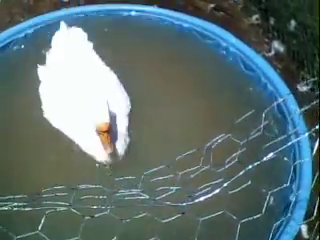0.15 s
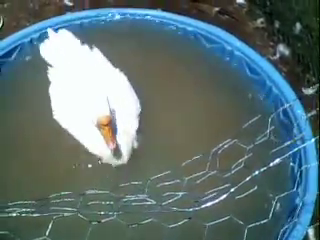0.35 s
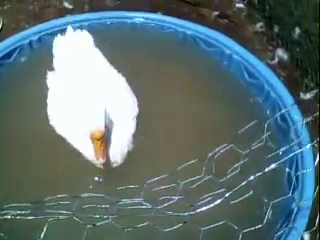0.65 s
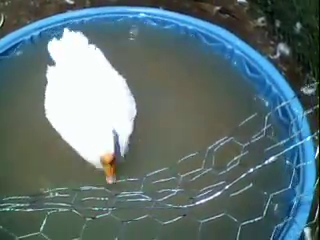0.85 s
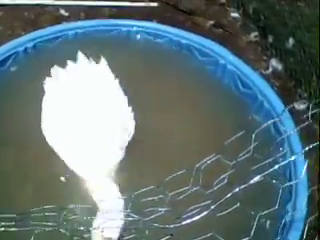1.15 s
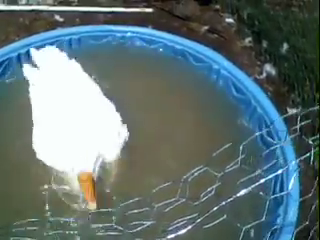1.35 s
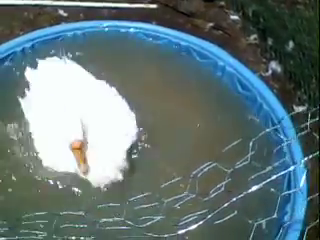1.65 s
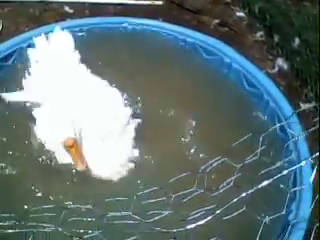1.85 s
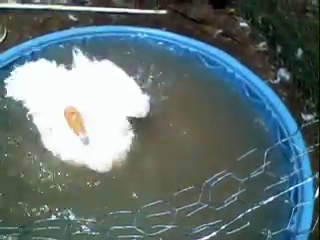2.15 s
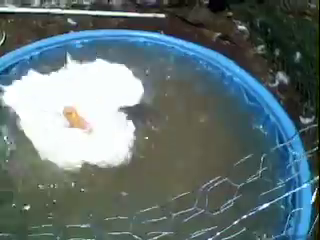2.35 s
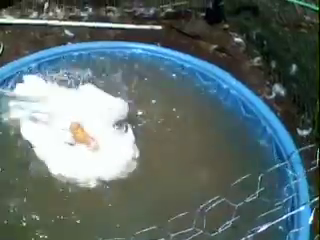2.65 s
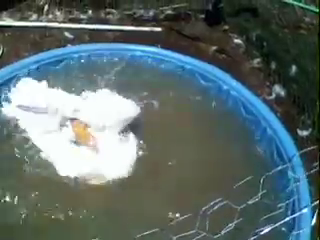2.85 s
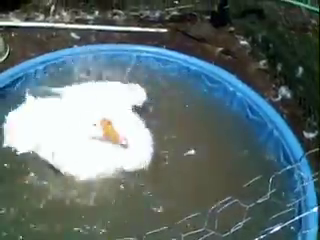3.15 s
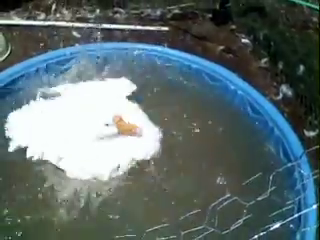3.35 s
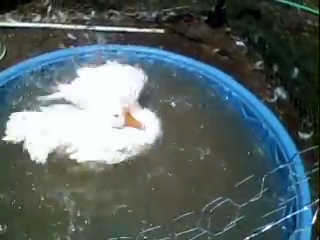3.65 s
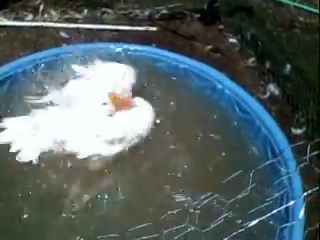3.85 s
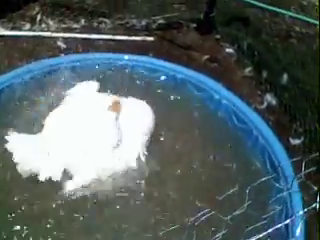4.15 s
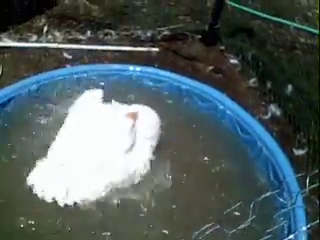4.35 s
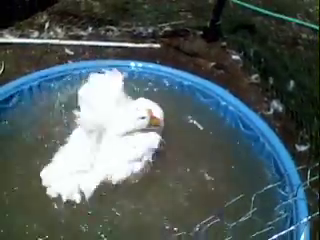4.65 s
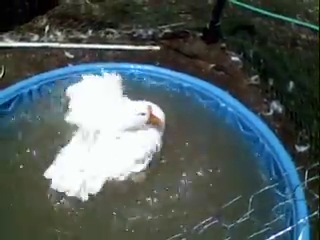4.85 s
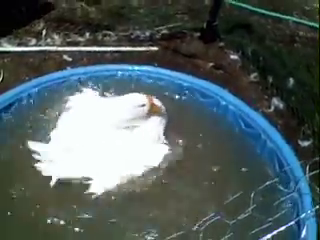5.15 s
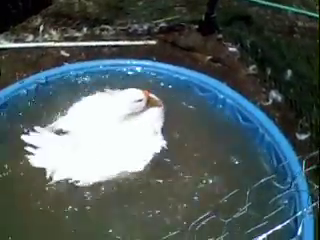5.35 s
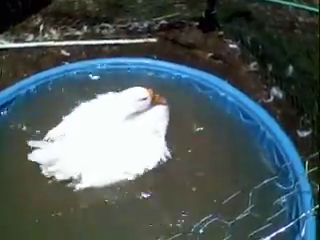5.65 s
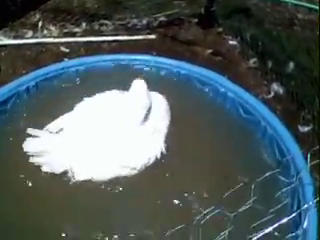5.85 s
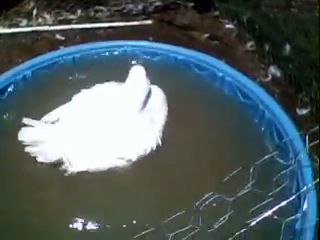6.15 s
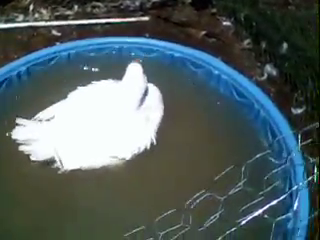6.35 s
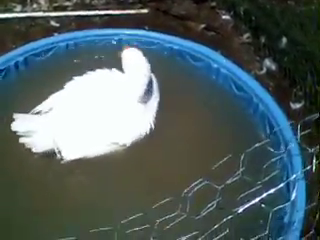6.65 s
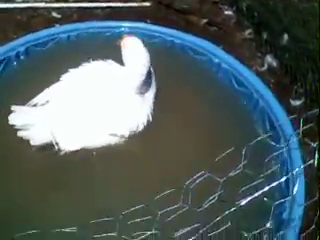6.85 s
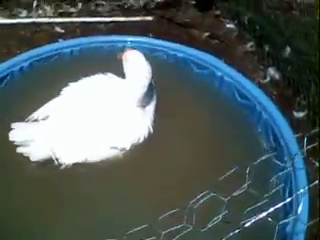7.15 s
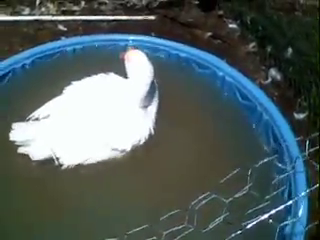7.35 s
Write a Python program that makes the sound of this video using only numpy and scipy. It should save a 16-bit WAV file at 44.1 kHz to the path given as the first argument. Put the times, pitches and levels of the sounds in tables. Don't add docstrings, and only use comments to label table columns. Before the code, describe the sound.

Wind buffets the microphone, then a bird's beak plunges with a bubble and wings slosh and slap water before gusts return alone.

```python
import sys
import numpy as np
from scipy import signal
from scipy.fft import rfft, irfft, next_fast_len
from scipy.io import wavfile
from scipy.ndimage import uniform_filter1d

SR = 44100
rng = np.random.default_rng(int(sys.argv[2]) if len(sys.argv) > 2 else 0)


def dump_mix(stems):
    frames = np.atleast_2d(stems).T
    limited = np.clip(frames, -1, 1)
    pcm = np.round(limited * 32767).astype(np.int16)
    wavfile.write(sys.argv[1], SR, pcm)


def undo_db(level):
    steps = np.asarray(level, float) / 20
    return 10 ** steps


N = 331014


def rms_one(x):
    return x / np.sqrt(np.mean(x ** 2) + 1e-20)


def in_time(rows, outside=None):
    s, *columns = np.transpose(rows)
    t = np.arange(N) / SR
    return [np.interp(t, s, column, left=outside, right=outside) for column in columns]


def band(x, low_hz, high_hz, order=2):
    return signal.sosfilt(signal.butter(order, [low_hz, high_hz], "band", fs=SR, output="sos"), x)


def coloured(spectrum):
    size = next_fast_len(N)
    hz, db = np.transpose(spectrum)
    bins_hz = np.arange(size // 2 + 1) * SR / size + 0.055
    gain = undo_db(np.interp(np.log(bins_hz), np.log(hz), db))
    noise = rng.standard_normal(size)
    return rms_one(irfft(rfft(noise) * gain, size)[:N])


def drift(rate):
    r = np.exp(-40 * np.pi * rate / SR)
    coarse = rng.standard_normal(N // 20 + 4002)
    slow = signal.lfilter([1], [1, -2 * r, r * r], coarse)[4000:]
    return np.interp(np.arange(N) / 20, np.arange(len(slow)), rms_one(slow))


def add(out, s, sound):
    i = int(s * SR)
    out[i:i + len(sound)] += sound[:N - i]


def bubble(hz, t60, rise, onset_s):
    t = np.arange(int(t60 * SR) + 2) / SR
    ring = np.sin(2 * np.pi * hz * (t + rise * t * t / (2 * t60)))
    return ring * undo_db(-60 * t / t60) * (1 - np.exp(-t / onset_s))


def patter(per_s, spread_db, clump_db, surge, smooth):
    sizes = undo_db(spread_db * np.minimum(rng.exponential(1, N), 5)) * rng.choice([-1, 1], N)
    born = rng.random(N) < per_s / SR
    clicks = rms_one(sizes * born)
    return rms_one((clicks + smooth * rng.standard_normal(N)) * undo_db(clump_db * surge))


# f/Hz, level/dB per Hz
HISS_COLOUR = [(100, 14.5), (2000, -3), (9000, -3.5), (10500, -6), (11500, -24.5), (12200, -23),
               (20000, -60)]
# f/Hz, level/dB rms
WHINE_TONES = [(1200, -92), (4200, -92), (4800, -96), (5600, -83), (6200, -93), (6600, -96), (7400, -82),
               (8400, -95), (8670, -98), (9000, -100), (10526, -99), (10800, -99), (11250, -102),
               (11524, -106)]


def circuits():
    t = np.arange(N) / SR
    dipping = (t * 100 / 3 - .68) % 1 < .3
    whines = sum(undo_db(db + 5.5) * np.sin(2 * np.pi * (hz * t + rng.random())) for hz, db in WHINE_TONES)
    return undo_db(-70.5) * coloured(HISS_COLOUR) + (1 - .7 * dipping) * whines


# f/Hz, level/dB per Hz
YARD_COLOUR = [(180, -5.5), (350, -4.5), (850, -3.5), (1200, -14), (2200, -22), (4000, -32), (7000, -35)]


def yard():
    start_db, fade_db_per_s, floor_db = -67, 9.5, -76.5
    level = undo_db(start_db - fade_db_per_s * np.arange(N) / SR) + undo_db(floor_db)
    return level * coloured(YARD_COLOUR) * undo_db(0.3 * drift(6.6))


# t/s, level/dB
BREEZE_CURVE = [(0, -43), (.3, -40.5), (.7, -38.5), (1.1, -41), (1.32, -67), (1.5, -43), (2.0, -40.5),
                (2.9, -38.5), (3.3, -50.5), (3.6, -32.5), (4.1, -42.5), (4.7, -39), (5.1, -44), (5.6, -43),
                (6.0, -38), (6.6, -38.5), (7.25, -51), (7.51, -44)]
# t/s of the peak, level/dB, half width/s, sharpness/dB
GUST_PEAKS = [(.23, -31, 0.15, -6), (.48, -26, 0.13, -5), (0.812, -33.5, 0.18, -16),
              (.87, -29.5, 0.036, 5.5), (.97, -31.5, 0.11, 5.5), (5.93, -22.5, 0.032, -8),
              (6.63, -39.5, 0.029, 8.5), (6.77, -39, 0.033, 6), (7.0, -35.5, 0.038, 3),
              (7.234, -41, 0.0091, 10.5), (1.189, -26.5, 0.029, -1.5), (1.38, -32, 0.027, -6),
              (1.841, -41, 0.031, 3), (2.05, -41, 0.033, -1), (2.336, -26, 0.052, -3),
              (2.53, -45, 0.065, 11), (2.739, -32.5, 0.023, 3.5), (3.17, -35, 0.12, 8),
              (3.392, -35, 0.012, -14), (3.51, -33.5, 0.099, 6.5), (3.82, -34, 0.23, 4),
              (4.12, -37, 0.036, -17), (4.22, -52, 0.049, -6), (4.6, -42, 0.049, 6.5),
              (4.89, -32.5, 0.062, 0), (5.248, -26.5, 0.061, -0.5), (5.73, -42.5, 0.11, 10.5),
              (6.081, -27, 0.058, 2), (6.241, -22.5, 0.037, 2), (6.32, -33.5, 0.054, 7),
              (6.5, -26.5, 0.055, -10.5), (6.7, -43.5, 0.051, 11.5), (6.82, -32, 0.021, -8),
              (6.94, -35.5, 0.13, -4), (7.21, -35.5, 0.14, -2)]
MEAN_WIND_DB = -37


def wind_strength():
    t = np.arange(N)[::32] / SR
    force = undo_db(2 * in_time(BREEZE_CURVE)[0][::32])
    bite = force.copy()
    for s, db, width, sharp_db in GUST_PEAKS:
        hump_db = db - 10 * np.abs(t - s) / max(width, .01)
        force += undo_db(2 * hump_db)
        bite += undo_db(2 * (hump_db + sharp_db))
    return [np.interp(np.arange(N) / SR, t, 10 * np.log10(power) - MEAN_WIND_DB) for power in (force, bite)]


# f/Hz, level/dB per Hz
BUFFET_COLOUR = [(8.8, -63), (15, 6), (24, -1.5), (43, -3), (92, -18.5), (120, -30), (160, -48),
                 (260, -120)]
# f/Hz, level/dB per Hz
TURBULENCE_COLOUR = [(47, -20), (80, -2.5), (214, -16.5), (292, -19.5), (450, -30), (580, -34.5),
                     (990, -120)]
# f/Hz, level/dB per Hz
RUSH_COLOUR = [(200, -28), (400, 0.5), (900, -5), (1300, -16), (2300, -25.5), (4000, -42)]
PRESSURE_DB, TURBULENCE_DB, RUSH_DB = -33, -56, -68.5
PRESSURE_FOLLOWS, TURBULENCE_FOLLOWS, RUSH_FOLLOWS = 0.87, 1, 0.62


def wind():
    force_db, bite_db = wind_strength()
    slow_db = uniform_filter1d(force_db, int(0.68 * SR))
    pressure = coloured([(1, -25), (3, 2.0), (16, 1.0), (24, -15.0), (60, -76)])
    puffs = drift(14.0)
    buffet = rms_one(coloured(BUFFET_COLOUR) * undo_db(0.58 * puffs))
    turbulence = rms_one(coloured(TURBULENCE_COLOUR) * undo_db(2.0 * puffs + 2.0 * drift(49)))
    rush = rms_one(coloured(RUSH_COLOUR) * undo_db(2.3 * puffs + 2.0 * drift(58)))
    lows = undo_db(PRESSURE_DB + PRESSURE_FOLLOWS * slow_db) * pressure + undo_db(MEAN_WIND_DB + force_db) * buffet
    mids = undo_db(TURBULENCE_DB + TURBULENCE_FOLLOWS * bite_db + 5.5) * turbulence
    return lows + mids + undo_db(RUSH_DB + RUSH_FOLLOWS * bite_db) * rush


# t/s, level/dB
TINY_CLICKS = [
    (0.135, -42),
    (0.529, -37.5),
    (5.753, -43),
    (6.126, -42),
    (6.415, -48),
]


def tiny_clicks():
    out, samples = np.zeros(N), np.arange(60)
    for s, db in TINY_CLICKS:
        add(out, s, undo_db(db) * np.exp(-samples / 10.0) * (1 - np.exp(-samples)))
    return out


# t/s, level/dB, low share/dB
BEAK_RASP = [
    (1.163, -65, -3),
    (1.167, -46.5, 5),
    (1.176, -46, -9),
    (1.186, -43.5, 4),
    (1.198, -52, -17),
    (1.212, -53, 0),
    (1.218, -81, -3),
]
# f/Hz, width/Hz, level/dB
WIRE_RINGS = [(1290, 220, -3), (1950, 140, -14), (3800, 270, -3), (4570, 1100, -11.5), (6950, 320, -21.5),
              (5250, 1400, -11), (6420, 1100, -15), (2900, 200, -13), (9600, 530, -23)]


def rasp():
    level_db, low_db = in_time(BEAK_RASP, outside=-120)
    slips = patter(2500, 3.9, 3.3, drift(150), 0.46)
    wire = sum(undo_db(db) * rms_one(band(slips, hz - width / 2, hz + width / 2)) for hz, width, db in WIRE_RINGS)
    mesh = undo_db(low_db) * rms_one(band(slips, 480, 1250))
    return undo_db(level_db) * (wire + mesh)


# t/s, peak level/dB, ring f/Hz
TICKS = [(1.3009, -60, 5580), (1.3209, -44, 6760), (1.3654, -53, 3390), (1.4202, -40, 3050),
         (1.4334, -50, 5610), (1.48, -44, 6790), (1.503, -48, 4060), (1.5914, -44, 4030),
         (1.6482, -43, 3830), (1.6684, -49, 5580), (1.803, -47, 3840), (1.9634, -41, 3830),
         (1.997, -50, 5520), (2.099, -61, 3800), (2.2554, -57, 5710), (2.4444, -53, 3870),
         (2.5505, -47, 4050), (2.6245, -44, 5570), (2.7694, -58, 5400), (2.8589, -51, 3580),
         (2.9248, -41, 4430), (3.003, -57, 3840), (3.1438, -44, 5570), (3.3139, -54, 4150),
         (3.322, -45, 3900), (3.3766, -27, 5350), (3.462, -44, 3900), (3.531, -42, 4100),
         (3.5548, -37.5, 5560), (3.5786, -40, 4000), (3.666, -38.5, 5500), (3.6765, -45, 3790),
         (3.758, -37, 3900), (3.8227, -43, 3670), (3.867, -46, 4010), (3.9534, -39, 3920),
         (3.9709, -38, 5600), (4.0317, -41, 4030), (4.12, -43, 5570), (4.1485, -41, 6110),
         (4.2941, -48, 4060), (4.371, -34, 3750), (4.5153, -44, 5600), (4.5445, -48, 3940),
         (4.5957, -46, 5500), (4.6708, -40.5, 5600), (4.7092, -52, 4300), (4.8209, -50, 5550),
         (4.8943, -42, 3640), (4.9566, -40, 3970), (4.9944, -42, 2940), (5.1705, -44, 5460),
         (5.2889, -47, 3920)]
# t/s, peak level/dB, ring f/Hz
FLICKS = [(1.5319, -45, 9330), (1.6866, -55, 9100), (2.0986, -57, 9160), (3.1667, -37, 8950),
          (3.3772, -29, 9120), (3.9724, -59, 9150), (4.0811, -41, 9300), (4.3555, -53, 9280),
          (5.1931, -40, 9200), (5.5837, -36.5, 9250)]
# t/s, peak level/dB, ring f/Hz
PECKS = [
    (0.1491, -54, 3080),
    (0.19, -56, 4090),
    (0.2523, -55, 5700),
    (0.2857, -53, 2700),
]
# t/s, peak level/dB, f/Hz
BLIPS = [(1.768, -54, 1900), (2.125, -47, 651), (2.553, -40, 800), (2.691, -44, 960), (2.811, -44.5, 859),
         (2.879, -44, 700), (2.923, -46, 845), (3.282, -41, 1360), (3.351, -53, 845), (3.441, -38, 940),
         (3.578, -34, 1950), (3.61, -41, 870), (3.727, -39, 2020), (3.779, -45, 1340), (3.9, -47, 780),
         (3.926, -40, 1330), (3.994, -39, 830), (4.049, -36.5, 780), (4.122, -37, 965),
         (4.297, -39.5, 1840), (4.593, -45, 820), (4.703, -45, 764), (4.933, -49, 807), (4.97, -44, 880),
         (5.022, -44, 940), (5.044, -46, 786), (5.319, -40, 770), (5.344, -49, 1310), (5.396, -49, 1330),
         (0.7068, -62, 1200), (0.836, -66, 1200), (1.051, -55, 1320), (1.4032, -52, 1320),
        (1.4314, -55, 1250), (1.5179, -54, 1360), (1.5744, -58, 1790), (1.5883, -47, 1920),
        (1.8456, -55, 1300), (2.3744, -44, 1950), (2.4487, -38, 1340), (2.4803, -42.5, 1990),
        (2.7242, -42, 1950), (2.966, -42, 1380), (3.1183, -41, 1360), (3.1358, -43, 1360),
        (3.212, -42, 1290), (3.257, -42, 1320), (3.6431, -44, 2000), (3.8102, -48, 1270),
        (4.1644, -39, 1360), (4.2233, -43, 1850), (4.342, -42, 1320), (4.3844, -43, 1920),
        (4.5625, -46, 1830), (4.722, -41, 1800), (4.8319, -37, 1540), (4.9944, -42, 2070),
        (5.1946, -46, 1310), (5.3737, -48, 2070)]
# t/s, peak level/dB, f/Hz
GLUGS = [(2.555, -49, 283), (3.184, -35, 441), (3.658, -47, 355), (3.93, -47, 301), (4.171, -44, 475),
         (4.556, -44, 450), (4.914, -48, 307), (4.975, -45, 479), (5.15, -38, 439), (5.191, -46, 283),
         (5.234, -48, 288)]


def droplets():
    out, snap = np.zeros(N), band(np.arange(300) == 0, 1500, 11000, order=1)
    tick_onset_s = 0.00076
    for s, db, hz in TICKS + FLICKS + PECKS:
        add(out, s, undo_db(db - 7.5) * bubble(hz, 30 / hz, 0.05, tick_onset_s))
        add(out, s + tick_onset_s, undo_db(db - 7.5) * snap / snap.max())
    for s, db, hz in BLIPS:
        add(out, s, undo_db(db - 7.5) * bubble(hz, 34 / hz, 0.22, 0.00069))
    for s, db, hz in GLUGS:
        add(out, s, undo_db(db - 3) * bubble(0.93 * hz, 17 / hz, 0.4, 0.003))
    return out


# t/s, level/dB, start f/Hz, end f/Hz, length/s
AIR_POCKETS = [(0.341, -66.5, 1650, 2050, 0.02), (1.226, -71.5, 1766, 1850, 0.07),
               (5.117, -47.5, 1580, 1960, 0.012), (3.268, -57, 1220, 1310, 0.028),
               (1.956, -51, 690, 1340, 0.036), (2.212, -54, 995, 1650, 0.039),
               (2.228, -52.5, 685, 1040, 0.044), (2.327, -44.5, 418, 540, 0.027),
               (2.638, -61, 685, 980, 0.035), (2.69, -58, 648, 1390, 0.037), (2.868, -58, 567, 976, 0.038),
               (2.948, -50, 870, 1455, 0.036), (4.009, -48.5, 1220, 1380, 0.012),
               (4.611, -56.5, 1870, 2110, 0.013), (4.259, -71, 696, 1410, 0.033),
               (4.32, -56, 836, 1060, 0.044), (4.345, -55, 378, 590, 0.039),
               (4.378, -60, 1060, 1490, 0.026), (4.857, -51.5, 680, 1005, 0.023),
               (4.872, -54, 900, 1450, 0.022), (5.04, -61.5, 720, 1095, 0.039),
               (3.262, -58, 716, 900, 0.03), (5.44, -64.5, 700, 1150, 0.047),
               (5.095, -51, 412, 1500, 0.019), (5.148, -49.5, 392, 885, 0.019),
               (5.168, -41.5, 840, 1720, 0.014), (5.297, -48, 421, 646, 0.033)]


def gulps():
    out, wobble = np.zeros(N), undo_db(7 * drift(140) - 2)
    for s, db, low_hz, high_hz, length in AIR_POCKETS:
        part = np.arange(int(length * SR)) / (length * SR)
        phase = 2 * np.pi * np.cumsum(low_hz + (high_hz - low_hz) * part) / SR
        swell = np.sin(np.pi * part ** 0.5) * wobble[int(s * SR):][:len(part)]
        add(out, s, undo_db(db) * np.sin(phase) * swell)
    return out


# t/s, peak level/dB, f/Hz, t60/s
PLOPS = [ (1.434, -41.5, 743, 0.1), (1.482, -39, 1063, 0.083), (1.689, -49, 1340, 0.043),
         (1.726, -41.5, 2030, 0.041), (2.045, -28, 880, 0.011), (2.316, -38.5, 545, 0.054),
         (2.513, -38, 930, 0.035), (2.635, -31, 807, 0.035), (2.666, -34.5, 800, 0.026),
         (2.939, -30, 940, 0.019), (2.966, -23, 1100, 0.0061), (3.037, -35, 1010, 0.073),
         (3.124, -27.5, 507, 0.016), (3.233, -37.5, 1300, 0.044), (3.316, -26.5, 865, 0.021),
         (3.377, -22, 880, 0.021), (3.524, -32.5, 800, 0.023), (3.541, -32, 536, 0.019),
         (3.756, -37.5, 847, 0.043), (3.952, -32, 725, 0.016), (3.968, -25, 755, 0.027),
         (4.082, -35, 960, 0.033), (4.143, -37.5, 840, 0.056), (4.657, -33, 1940, 0.016),
         (4.722, -33, 470, 0.027), (4.749, -34, 960, 0.027), (5.094, -31.5, 507, 0.036),
         (5.118, -33.5, 1294, 0.07), (5.159, -40, 900, 0.037), (5.276, -35.5, 852, 0.051)]
# t/s, peak level/dB, f/Hz, t60/s
STRAY_BUBBLES = [
    (1.065, -43.5, 860, 0.027),
    (1.627, -45.5, 883, 0.075),
    (1.165, -31, 885, 0.02),
    (1.201, -20.5, 573, 0.035),
    (1.227, -26.5, 607, 0.031),
    (5.573, -36, 520, 0.014),
    (6.21, -37, 660, 0.036),
    (7.006, -37.5, 595, 0.0088),
]


def plops():
    out, snap = np.zeros(N), band(np.arange(400) == 0, 350, 3000, order=1)
    for s, db, hz, t60 in PLOPS + STRAY_BUBBLES:
        add(out, s, undo_db(db - 9.5) * bubble(0.957 * hz, t60, 0.18, 0.00024))
        add(out, s + 0.0009, -undo_db(db - 28) * snap / snap.max())
    return out


# t/s, level/dB, f/Hz, t60/s
BODY_THUMPS = [
    (1.198, -31.5, 526, 0.049),
    (3.168, -40, 430, 0.26),
    (3.312, -39, 600, 0.022),
    (3.38, -32.5, 410, 0.12),
    (4.35, -47.5, 318, 0.12),
]


def thumps():
    out, t = np.zeros(N), np.arange(5000) / SR
    for s, db, hz, length in BODY_THUMPS:
        burst = rng.standard_normal(5000) * undo_db(-60 * t / length) * (1 - np.exp(-t / 0.0029))
        puff = band(burst, hz / 2.03, hz * 1.28)
        add(out, s, undo_db(db) * puff / np.abs(puff).max())
    return out


# t/s, peak level/dB, thud level/dB re peak, crack f/Hz
SLAPS = [(1.319, -52, -29, 6600), (1.5334, -37, -24, 5400), (1.6888, -43, 4.5, 3850),
         (1.7267, -40, -15, 3630), (1.889, -38, -17, 5100), (2.009, -37.5, -5, 3950),
         (2.04, -42, 9.5, 4130), (2.3168, -38.5, -0.5, 4400), (3.153, -46, -3, 5390),
         (3.1658, -20.5, -3, 5800), (3.246, -35.5, -17, 5330), (3.354, -34, -13, 4080),
         (3.489, -28.5, -17, 3900), (3.6467, -31, -21, 4200), (3.7401, -40, 4, 4090),
         (3.927, -42.5, 11, 5340), (3.962, -39, 2, 5470), (4.077, -49, -10, 4080), (4.736, -61, 17, 5140),
         (4.7507, -38, 0.5, 3960), (4.925, -34, -29, 4040), (5.1928, -37.5, 0, 5700),
         (5.314, -39, -6, 4040), (5.3577, -39.5, -21, 3960), (5.3732, -46, 3.5, 5590)]
# t/s, peak level/dB, thud level/dB
# re peak, crack f/Hz
SHEETS = [(1.4126, -44.5, 1, 3060), (2.7457, -37.5, -1, 4100), (3.3741, -27, -3.5, 5860),
          (3.762, -36.5, 2, 3920), (4.1032, -42, 5, 4060), (4.355, -37, -0.5, 3840),
          (4.9626, -41.5, 6, 3820), (5.583, -37, -26, 8500), (1.225, -60, 20, 3100)]
# t/s, peak level/dB, thud level/dB re peak, crack f/Hz
KNOCKS = [
    (0.25, -44, -12, 5670),
    (0.2857, -43.5, -12, 4010),
    (1.169, -51, 14, 3820),
    (1.2004, -47.5, 22, 3890),
    (5.5733, -50, 8, 5750),
]


def slaps():
    out, t = np.zeros(N), np.arange(3000) / SR
    for table, t60 in [(SLAPS, 0.013), (SHEETS, 0.033), (KNOCKS, 0.0043)]:
        for s, db, thud_db, hz in table:
            sharp, dull = rng.standard_normal((2, 3000))
            burst = sharp * undo_db(-60 * t / t60) * (1 - np.exp(-t / (0.089 * t60)))
            crack = band(burst, hz / 1.39, hz * 1.24) + 0.55 * band(burst, 2400, 8800)
            thud = band(dull * undo_db(-60 * t / (2.9 * t60)) * (1 - np.exp(-t / 0.0065)), 207, 1740)
            add(out, s, undo_db(db - 14.5) * crack / np.abs(crack).max())
            add(out, s, undo_db(db + thud_db - 10.0) * thud / np.abs(thud).max())
    return out


def impacts():
    marks = np.zeros(N)
    swell, settle = int(0.011 * SR), int(0.22 * SR)
    np.add.at(marks, [int(row[0] * SR) for row in SLAPS + SHEETS + TICKS + PLOPS], 1)
    crowd = np.sqrt(np.maximum(uniform_filter1d(uniform_filter1d(marks, swell), swell), 0))
    around = uniform_filter1d(crowd, settle)
    return (crowd - around) / np.std(crowd[around > 1e-6])


def swarm(low_hz, high_hz, cycles, level_db, count):
    out = np.zeros(N)
    for when, pitch, size, long in rng.random((count, 4)):
        hz = low_hz * (high_hz / low_hz) ** pitch
        add(out, when * N / SR, undo_db(6.4 * size) * bubble(hz, cycles * (.5 + long) / hz, 0.633, 2.0 / hz))
    return undo_db(level_db) * rms_one(out)


# t/s, level/dB re the middle of the bath
CHURNING = [(0, -11), (.3, -8.5), (.42, -25), (1.2, -19), (1.3, -12), (1.58, -4.5), (2.02, -3.5), (2.43, 1),
            (2.8, -0.5), (3.37, 7), (3.85, 4.5), (4.2, 5.5), (4.4, 0), (4.77, -.5), (5.18, 0.5),
            (5.35, -3.5), (5.51, -9), (5.7, -28)]
SLOSH_DB, SPRAY_DB, MIST_DB, WASH_DB = -60, -67, -74.5, -67.5
SPRAY_FOLLOWS, MIST_FOLLOWS, WASH_FOLLOWS = 0.77, 0.6, 1


def bath():
    vigour_db, = in_time(CHURNING)
    slosh_db = SLOSH_DB + vigour_db
    spray_db = SPRAY_DB + SPRAY_FOLLOWS * vigour_db
    mist_db = MIST_DB + MIST_FOLLOWS * vigour_db
    wash_db = WASH_DB + WASH_FOLLOWS * vigour_db
    surge = 0.53 * impacts() + 0.81 * drift(17.6)
    slosh = band(patter(1500, 3.5, 1.93, surge + 0.5 * drift(29), 0.62), 256, 1920)
    spray = band(patter(4000, 4.8, 3.4, surge + 0.93 * drift(31), 0.54), 2900, 7270)
    mist = band(patter(4000, 5.4, 3.0, surge + .5 * drift(45), 0.43), 7300, 11100)
    froth = undo_db(slosh_db - 5.5) * rms_one(slosh) + undo_db(spray_db - 6.5) * rms_one(spray)
    froth += undo_db(mist_db - 5.0) * rms_one(mist)
    bubbles = swarm(463, 2197, 21.1, slosh_db - 5.0 + surge, count=900)
    bubbles += swarm(2604, 7500, 26.6, spray_db - 9.5, count=900)
    wash = band(rng.standard_normal(N), 240, 725) * undo_db(1.7 * surge + 5.0 * drift(10.4))
    return froth + bubbles + undo_db(wash_db) * rms_one(wash)


def pool(x):
    out, dull = x.copy(), band(x, 400, 9700, order=1)
    for lag_s, db in [(.0043, -40), (.0079, -19), (.0131, -18.5), (.021, -33)]:
        add(out, lag_s, undo_db(db) * dull)
    return out


# f/Hz, width/Hz, level/dB
HOUSING_PEAKS = [(870, 182, 6), (1329, 95, 6.5), (1668, 210, -8), (1907, 470, 11), (2620, 280, -13),
                 (2950, 98, 4.5), (4010, 780, 10), (5535, 760, 11), (6760, 470, 3.5), (7680, 1000, -8.5),
                 (9264, 1280, 13)]


def housing(x):
    for hz, width, db in HOUSING_PEAKS:
        w, a = 2 * np.pi * hz / SR, undo_db(db / 2)
        q = np.sin(w) * width / (2 * hz)
        x = signal.lfilter([1 + q * a, -2 * np.cos(w), 1 - q * a], [1 + q / a, -2 * np.cos(w), 1 - q / a], x)
    return x


def scene():
    water = bath() + slaps() + thumps() + pool(plops() + gulps() + droplets())
    return (wind() + housing(water) + rasp() + tiny_clicks() + yard())[None]


def top_cut(x):
    return signal.sosfilt(signal.butter(12, 11940, fs=SR, output="sos"), x)


def record(dry):
    cut = signal.sosfilt(signal.butter(6, 10000, fs=SR, output="sos"), dry)
    offset = -0.013
    return top_cut(cut + circuits() + offset)


dry = scene()
out = record(dry)
dump_mix(out)
```